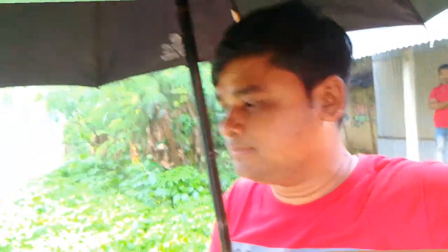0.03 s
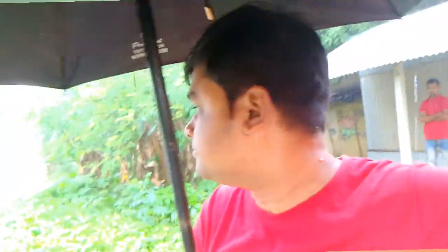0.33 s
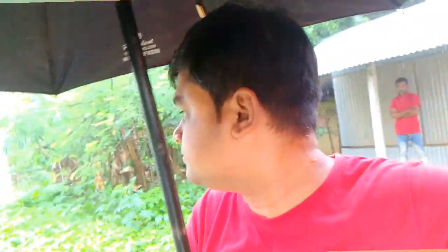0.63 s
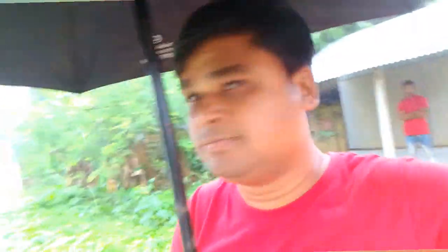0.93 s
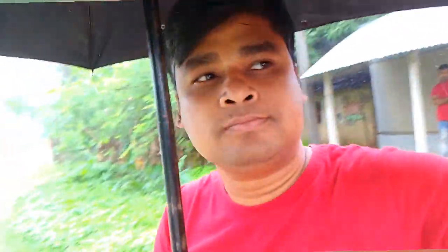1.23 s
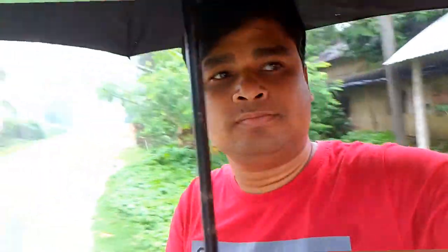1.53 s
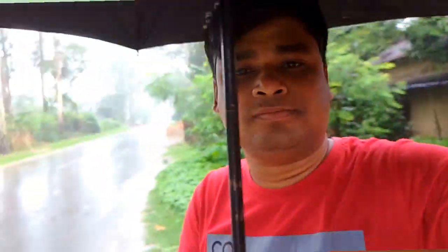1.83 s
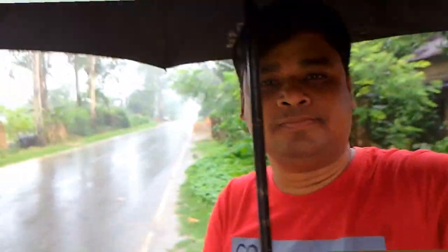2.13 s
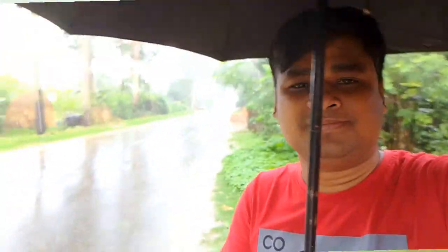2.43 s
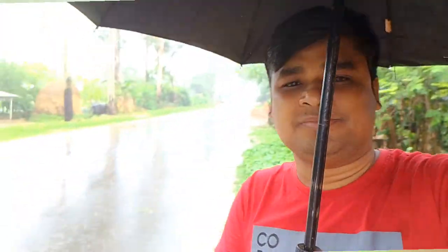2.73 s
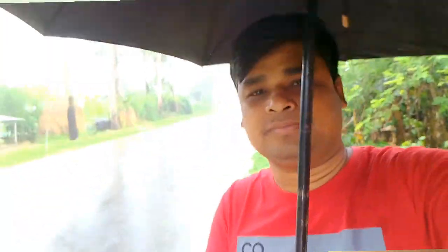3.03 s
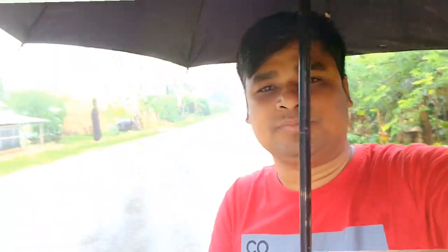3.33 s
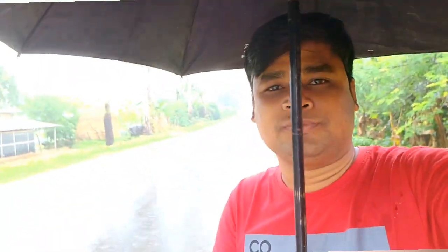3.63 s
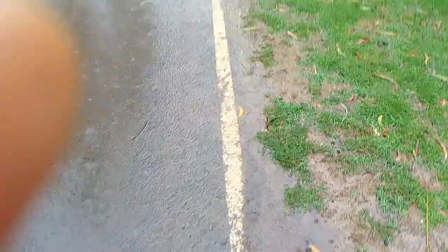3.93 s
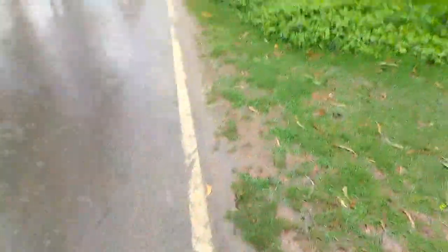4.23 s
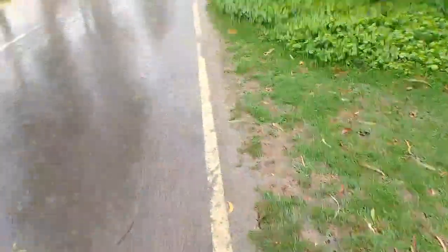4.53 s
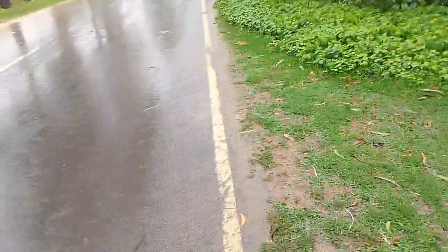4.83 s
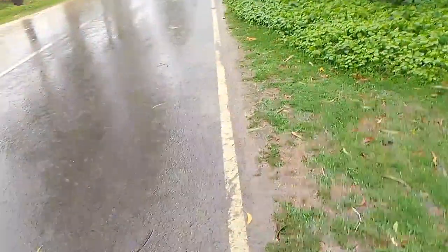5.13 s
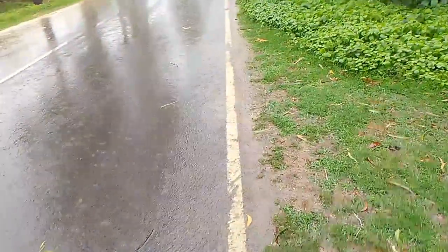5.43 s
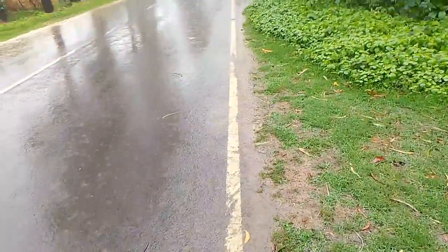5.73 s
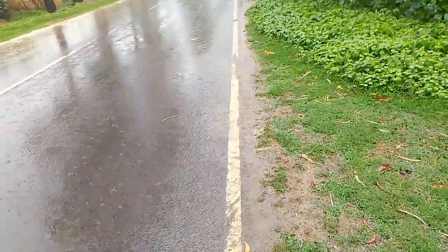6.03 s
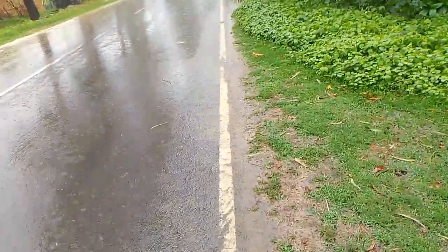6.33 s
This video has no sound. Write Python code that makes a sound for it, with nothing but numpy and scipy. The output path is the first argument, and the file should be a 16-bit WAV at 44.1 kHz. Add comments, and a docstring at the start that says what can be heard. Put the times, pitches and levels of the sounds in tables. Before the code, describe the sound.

Steady rain at a roadside is heard from under an umbrella. From the start, dense small drops tap the taut cloth just overhead, with fatter ones knocking above the rest. Farther off, rain washes over road and leaves and fizzes on the wet ground. During the first 2 seconds, air buffets the microphone with low rumbles and soft thumps, strongest around 1.7 seconds. Now and then a drop splashes nearby with a bright tick, notably around 2.5 and 3.2 seconds. At about 3.9 seconds the sound cuts to silence. It returns at 4.3 seconds, hollow and with a watery ring that fades over the next second. The rain fills out again, with heavier, more distinct taps on the cloth and a few more close splashes, continuing until about 6.6 seconds.

```python
"""Steady rain at a roadside, on one microphone under an umbrella.
Close overhead, drops tap the taut cloth; farther off, rain washes over road and leaves and fizzes
on the wet ground. At first air buffets the microphone, and now and then a drop splashes nearby.
Near 3.9 s the sound stops for about half a second. It returns hollow, with a watery ring,
and fills out again with heavier taps."""
import sys
import numpy as np
from scipy import signal
from scipy.fft import rfft, irfft
from scipy.io import wavfile
from scipy.ndimage import uniform_filter1d

SR = 44100
rng = np.random.default_rng(int(sys.argv[2]) if len(sys.argv) > 2 else 0)


def generate_wav(signal):
    """Clip the signal to [-1, 1] and save it as 16-bit WAV at the path in sys.argv[1]."""
    frames = np.transpose(np.atleast_2d(signal))
    scaled = np.clip(frames, -1, 1) * 32767
    pcm = np.round(scaled).astype(np.int16)
    wavfile.write(sys.argv[1], SR, pcm)


N = 289737
TIME = np.arange(N) / SR
PAUSE_START_S, PAUSE_END_S = 3.8697, 4.3273

# spectra of the far wash and of the spray on the ground: frequency_hz, relative_db
WASH_SPECTRUM = [(30, -10.5), (100, -4.5), (200, -7.5), (500, -2), (1000, 2.5), (1800, 2.5), (2500, -1),
                 (3500, -1.5), (4200, -16), (6500, -16), (15500, -46.5)]
SPRAY_SPECTRUM = [(1500, -19.5), (4000, -6.5), (5200, -6.5), (6500, -12), (8300, -8), (10300, -9),
                  (12000, -14.5), (15500, -16.5)]
# brief flurries and lulls in the rain: start_s, length_s, patter_rise_db, spray_rise_db
FLURRIES = [(1.216, 0.037, -5, -1), (2.4, 0.19, 0.5, 1), (3.143, 0.19, 0, 1), (3.486, 0.093, 2.5, 0),
            (3.638, 0.064, -7, -1), (4.312, .047, -7, 1), (4.414, 0.043, -10, -2), (4.768, .05, -0.5, 0.5),
            (5.31, 0.039, -5, 0), (5.451, 0.016, -9, -1), (5.624, 0.024, 1.5, -2), (5.733, 0.043, -6, -0.5),
            (5.89, .014, -4, -5), (5.915, .05, 1, -2), (6.272, 0.032, 1, 2), (6.328, 0.022, -11, 1),
            (6.425, 0.18, 1, 0)]
# gusts on the microphone: start_s, length_s, level_db
GUSTS = [(0.119, 0.21, -35), (0.373, 0.044, -38), (0.637, 0.22, -37), (0.878, .1, -40.5),
         (1.026, 0.065, -32.5), (1.11, 0.24, -38.5), (1.278, 0.38, -41), (1.628, 0.11, -30),
         (1.767, 0.11, -36.5), (1.942, 0.075, -34), (2.135, 0.24, -45), (2.697, .14, -50),
         (3.376, 0.054, -47)]
# low puffs of air on the microphone: centre_s, peak_db, pitch_hz
PUFFS = [(0.147, -30, 55), (0.216, -30, 70), (0.293, -26, 50), (0.396, -27, 130), (0.654, -32, 70),
         (0.688, -27.5, 70), (0.767, -27.5, 80), (0.832, -30, 50), (1.034, -27, 90), (1.071, -30, 130),
         (1.19, -31.5, 70), (1.337, -31.5, 90), (1.672, -23, 140), (1.731, -20.5, 100), (1.862, -29.5, 55),
         (1.901, -31, 55), (2.01, -26.5, 80), (3.405, -34.5, 55), (5.075, -34, 60)]
# sharp splashes close by: start_s, level_db
SPLASHES = [(0.3303, -19.5), (0.4500, -18), (0.5438, -20), (0.564, -20), (2.021, -18.5), (2.422, -20),
            (2.481, -15), (2.5912, -15), (3.1936, -14.5), (3.2775, -18), (3.3694, -20), (3.3946, -16.5),
            (3.762, -22), (5.1166, -14), (5.5535, -16.5), (6.074, -20), (6.5517, -16.5)]
# spectrum of a tap on the cloth, before and after the pause: frequency_hz, relative_db
CLOTH_BEFORE = [(40, -10), (150, -6.5), (300, -1), (450, 1), (750, 0), (1100, -1.5), (1450, -2), (1850, 1),
                (2400, -5), (3400, -6), (4200, -12), (6500, -13.5), (8400, -13.5), (12000, -25.5),
                (15500, -20.5)]
CLOTH_AFTER = [(40, -18.5), (150, -6), (220, -2.5), (550, -1), (720, -6), (1050, 1), (1750, 2), (2400, 0),
               (3400, -5), (4200, -9), (6500, -15), (8300, -17), (12000, -18), (15500, -24)]
# the fattest drops on the cloth: start_s, level_db (energy taken over 3 ms), pitch_hz, soft_above_hz
HEAVY_DROPS = [(0.014, -25, 1800, 3600), (0.1184, -23.5, 1940, 3600), (0.294, -23.5, 450, 1000),
               (0.3221, -24, 470, 1500), (0.368, -25, 1340, 3600), (0.5936, -25, 1100, 2400),
               (0.7091, -27, 775, 2400), (0.7771, -24.5, 775, 2400), (0.821, -25.5, 1530, 3600),
               (0.9889, -26, 645, 2400), (1.0752, -25, 1660, 3600), (1.1262, -26.5, 1010, 3000),
               (1.1898, -22.5, 1810, 2400), (1.2091, -24.5, 925, 2800), (1.3579, -24.5, 2150, 4500),
               (1.4228, -27, 1010, 4500), (1.5004, -27, 1400, 3000), (1.6232, -27, 750, 3000),
               (1.6342, -25.5, 1660, 3600), (1.7232, -25.5, 1055, 4000), (1.7762, -26.5, 990, 4000),
               (1.8256, -23.5, 1800, 2600), (2.0285, -27, 690, 2400), (2.0981, -26, 860, 2400),
               (2.1196, -26, 1055, 4500), (2.2333, -25.5, 1010, 3000), (2.625, -27, 430, 2400),
               (2.6326, -24, 950, 2200), (2.6555, -24.5, 730, 3600), (2.7667, -26.5, 880, 2600),
               (2.8311, -25, 1530, 3600), (2.8944, -25.5, 1765, 3000), (3.055, -25, 1790, 2600),
               (3.0989, -26.5, 1310, 3000), (3.5074, -25.5, 710, 4000), (3.5436, -26.5, 1960, 3600),
               (3.6142, -26.5, 625, 3000), (3.6322, -25.5, 1850, 2400), (3.6855, -22.8, 1830, 3400),
               (3.8142, -25.5, 1980, 3000), (4.4522, -22, 1800, 3600), (4.508, -25, 1700, 2400),
               (4.5727, -25.5, 1250, 3000), (4.6452, -25, 1660, 3000), (4.796, -25, 1750, 3600),
               (4.868, -25.5, 1400, 6000), (4.9536, -24.5, 1030, 2600), (4.9866, -25.5, 1640, 3000),
               (5.0669, -25.5, 1440, 5000), (5.1151, -23.5, 1080, 3000), (5.2449, -24.5, 1570, 5000),
               (5.2843, -23.5, 1830, 3000), (5.4432, -24, 1120, 2400), (5.4723, -20.5, 1700, 1500),
               (5.4908, -25.5, 1120, 2000), (5.5064, -24.5, 1380, 3000), (5.547, -26, 1600, 5000),
               (5.5716, -22.5, 1100, 5500), (5.6385, -25, 1950, 4000), (5.6915, -24, 1790, 3000),
               (5.7155, -22.5, 1440, 3600), (5.7235, -25, 1350, 2000), (5.8063, -27, 880, 5000),
               (5.8344, -25.5, 990, 4500), (5.8829, -25, 1160, 2600), (5.9063, -22, 1380, 3400),
               (6.0201, -24.5, 1610, 2600), (6.1305, -25, 1485, 4500), (6.2172, -26, 1480, 3600),
               (6.3184, -24, 1120, 3400), (6.5199, -23.5, 1420, 2200), (6.5293, -24, 925, 4500),
               (6.5579, -24, 1810, 4000)]
# bands hollowed out after the pause: start_hz, width_hz, depth_db, full_again_s, sink_hz_per_s
HOLLOWS = [(102, 116, 27, 5.0, -7), (437, 75, 19, 5.4, 1), (664, 137, 21, 5.7, 4),
           (818, 305, 23.5, 4.98, 130), (1566, 110, 19, 5.2, 0), (1867, 45, 22, 14, -3),
           (2490, 190, 25, 5.6, 0), (3040, 940, 17, 4.77, 0), (3220, 110, 22, 5, 0),
           (3985, 380, 18, 5.3, 0), (4550, 100, 16, 6.2, 0), (4770, 890, 5, 4.7, 0),
           (5170, 290, 20, 5.4, 330), (6250, 670, 4, 5.2, 0), (7450, 100, 16, 6, 0),
           (7960, 760, 14, 4.48, 0), (9720, 130, 17, 5.3, 0), (12300, 2800, 15, 4.7, 0),
           (13880, 400, 20, 5.1, -200)]
# watery tones that ring when the sound returns: tone_hz, rise_db
RING_TONES = [(236, 9), (350, 2), (555, 8), (960, 4), (1060, 9), (1215, 6), (1500, 7), (1760, 7), (2045, 3),
              (2290, 5), (2627, 19), (2860, 12), (3090, 7), (3480, 18), (3750, 19), (3962, 20), (4200, 17),
              (4465, 21), (4870, 11), (5410, 18), (5770, 11), (5870, 12), (6770, 7), (6950, 10), (7190, 10),
              (7610, 6), (8080, 6), (8310, 7), (8699, 11), (9010, 7), (9330, 5), (9950, 7), (10280, 10),
              (10470, 11), (11380, 8), (11900, 8), (13380, 6), (14380, 9)]


def from_db(db):
    """Decibels to gain."""
    return 10 ** (np.asarray(db) / 20)


def rms_one(x):
    """Scale to an rms of 1."""
    return x / np.sqrt(np.mean(x ** 2) + 1e-20)


def response(spectrum, size=2048):
    """The sharpest causal pulse that has this spectrum (minimum phase); peak 1."""
    hz, level_db = np.transpose(spectrum)
    grid_hz = np.maximum(np.fft.rfftfreq(size, 1 / SR), 1)
    gain = from_db(np.interp(np.log(grid_hz), np.log(hz), level_db))
    cepstrum = irfft(np.log(gain))
    cepstrum[1:size // 2] *= 2
    cepstrum[size // 2 + 1:] = 0
    pulse = irfft(np.exp(rfft(cepstrum)))
    return pulse / np.abs(pulse).max()


def through(x, pulse):
    """Every sample of x plays the pulse."""
    return signal.fftconvolve(x, pulse)[:N]


def tailed_click(t60_s, tail_db, size=4096):
    """A click followed by a dying scatter of reflections."""
    age = TIME[:size]
    tail = rng.standard_normal(size) * from_db(-60 * age / t60_s) * (1 - np.exp(-age / 0.00027))
    pulse = from_db(tail_db) * tail / np.linalg.norm(tail)
    pulse[0] = 1
    return pulse


def rainfall(per_s, spread_db, max_spreads):
    """Impacts at random moments: many small ones, few large."""
    sizes = from_db(spread_db * np.minimum(rng.exponential(1, N), max_spreads))
    return sizes * (rng.random(N) < per_s / SR)


def wavering(depth_db, per_s):
    """A gain that wanders slightly at random."""
    steps = rng.standard_normal(1000)
    return from_db(depth_db * np.interp(TIME * per_s, np.arange(len(steps)), steps))


def settling(decay_s):
    """1 until the sound returns, then dying away."""
    return np.exp(-np.maximum(TIME - PAUSE_END_S, 0) / decay_s)


def flurries(edge_s=0.022):
    """Rise in dB of the patter and of the spray as flurries and lulls pass."""
    rise_db = np.zeros((2, N))
    for start_s, length_s, patter_db, spray_db in FLURRIES:
        inside_s = np.minimum(TIME - start_s, start_s + length_s - TIME)
        rise_db += np.outer([patter_db, spray_db], np.clip(inside_s / edge_s + .5, 0, 1))
    return rise_db


def wash():
    """Countless far drops on road and leaves merge into a smooth rush."""
    return rms_one(through(rng.standard_normal(N), response(WASH_SPECTRUM)))


def spray(peak_hz, width_hz, peak_db):
    """Fine droplets fizz on the wet ground, each a tick and a wisp of hiss, with one bright resonance."""
    ticks = rainfall(per_s=2000, spread_db=4, max_spreads=3.5) * rng.choice([-1, 1], N)
    dying = from_db(-60 * TIME[:2048] / .014) ** 2
    wisp_power = np.abs(through(ticks ** 2, dying / dying.sum()))
    grains = rms_one(ticks + np.sqrt(wisp_power) * rng.standard_normal(N))
    fizz = through(grains + from_db(1) * rng.standard_normal(N), response(SPRAY_SPECTRUM))
    resonance = signal.lfilter(*signal.iirpeak(peak_hz, peak_hz / width_hz, fs=SR), fizz)
    return rms_one(fizz + from_db(peak_db) * resonance)


def airflow(breeze_db=-45, calming_db_per_s=3, attack_s=0.018, release_s=0.011):
    """Strength of the air: each gust rises, holds and dies away over a weakening breeze."""
    power = from_db(breeze_db - calming_db_per_s * TIME) ** 2
    for start_s, length_s, level_db in GUSTS:
        rise = np.clip((TIME - start_s) / attack_s + .5, 0, 1)
        fall = np.exp(-np.maximum(TIME - start_s - length_s, 0) / release_s)
        power += (from_db(level_db) * rise * fall) ** 2
    return np.sqrt(power)


def buffeting():
    """Air moving across the microphone makes a lumpy low rumble."""
    spectrum = [(10, -20.5), (30, 0.5), (50, 0.5), (78, -2), (120, -8),   # frequency_hz, relative_db
                (200, -15.5), (400, -28), (1500, -86)]
    rumble = through(rng.standard_normal(N), response(spectrum))
    running_rms = np.sqrt(uniform_filter1d(rumble ** 2, size=4000) + 1e-12)
    return airflow() * rumble / running_rms


def puffs():
    """A sudden eddy gives the microphone one soft thump of pressure; small eddies sound higher."""
    thumps = np.zeros(N)
    for centre_s, peak_db, pitch_hz in PUFFS:
        swing = np.minimum((np.pi * pitch_hz * (TIME - centre_s)) ** 2, 30)
        thumps += from_db(peak_db) * (2 * swing - 1) * np.exp(-swing)
    return thumps


def splashes(ping_hz=8400):
    """A drop near the microphone bursts into droplets, with a brief bright ping."""
    bright = response([(1000, -18), (5000, -10), (7000, -6), (8500, 0), (11000, -1), (15500, -2)])
    burst = signal.fftconvolve(tailed_click(t60_s=.007, tail_db=6), bright)
    age = TIME[:len(burst)]
    ping = np.sin(2 * np.pi * ping_hz * age) * from_db(-60 * age / 0.01)
    splash = burst / np.abs(burst).max() + from_db(-5) * ping
    clicks = np.zeros(N)
    for start_s, level_db in SPLASHES:
        clicks[round(start_s * SR)] = from_db(level_db)
    return through(clicks, splash)


def canopy(rain):
    """Faint reflections under the dome of the umbrella colour the rain."""
    return through(rain, tailed_click(t60_s=.07, tail_db=-18))


def struck_spot(knock, pitch_hz, ring_db=1.5):
    """The struck spot of cloth adds a few cycles of its own pitch to the knock."""
    ring = signal.lfilter(*signal.iirpeak(pitch_hz, Q=5, fs=SR), knock)
    return knock + from_db(ring_db) * ring


def patter(drops, cloth, t60_s, ripple_db, spots=28):
    """Each drop pushes the cloth overhead down in one pulse; each spot has its own pitch and ripples."""
    spot_hit = rng.integers(0, spots, N)
    ripples = np.zeros(N)
    for spot, pitch_hz in enumerate(np.geomspace(420, 2900, spots)):   # slack cloth is low, taut high
        pulse = struck_spot(tailed_click(t60_s, ripple_db), pitch_hz)
        ripples += through(drops * (spot_hit == spot), pulse)
    taps = through(ripples, response(cloth))
    return rms_one(signal.sosfilt(signal.butter(1, 30, "high", fs=SR, output="sos"), taps))


def heavy_drops(cloth, ripple_db):
    """The fattest drops knock above the rest and ripple the cloth; a soft landing has little treble."""
    push = response(cloth)
    knocks = np.zeros(N + SR)
    for start_s, level_db, pitch_hz, soft_above_hz in HEAVY_DROPS:
        landing = signal.lfilter(*signal.butter(1, soft_above_hz, fs=SR), push)
        knock = signal.fftconvolve(tailed_click(t60_s=.015, tail_db=ripple_db), landing)
        knock = struck_spot(knock, pitch_hz)
        knock *= np.sqrt(.003 * SR / np.sum(knock ** 2))   # the energy of 3 ms at an rms of 1
        start = round(start_s * SR)
        knocks[start:start + len(knock)] += from_db(level_db) * knock
    return knocks[:N]


def light_rain(easing_db_per_s=0.38):
    """Dense small taps just above the microphone ease slowly, over the wash and spray."""
    patter_rise_db, spray_rise_db = flurries()
    drops = rainfall(per_s=900, spread_db=3, max_spreads=3)
    taps = patter(drops, CLOTH_BEFORE, t60_s=0.024, ripple_db=-2.5)
    taps *= from_db(-30 + patter_rise_db - easing_db_per_s * TIME)
    fizz = from_db(-35.5 + spray_rise_db) * spray(peak_hz=8400, width_hz=1300, peak_db=7.5)
    fizz *= wavering(depth_db=0.4, per_s=8.2)
    return taps + heavy_drops(CLOTH_BEFORE, ripple_db=4) + from_db(-34) * wash() + fizz


def heavy_rain():
    """Fewer, fatter drops stand out of the wash; the patter swells and settles as the spray fades in."""
    patter_rise_db, spray_rise_db = flurries()
    drops = rainfall(per_s=800, spread_db=5.3, max_spreads=2.2)
    taps = patter(drops, CLOTH_AFTER, t60_s=0.02, ripple_db=-8)
    surge_db = 4 * settling(decay_s=0.37) - 7.5 * settling(decay_s=0.11)
    taps *= from_db(-30.5 + patter_rise_db + surge_db)
    fizz = spray(peak_hz=8190, width_hz=1250, peak_db=10.5)
    fizz *= from_db(-35.4 + spray_rise_db - 13.5 * settling(decay_s=0.18))
    far_rain = from_db(-33) * wash()
    knocks = heavy_drops(CLOTH_AFTER, ripple_db=-1.5)
    return taps + far_rain + knocks + fizz * wavering(depth_db=0.5, per_s=5)


def ringing(hz, age_s, min_width_hz=70, q=85, fade_s=.42):
    """Gain by frequency and time: narrow tones give a watery ring that dies away."""
    tones_db = -7.0 * ((hz > 2450) & (hz < 6600))   # thins the hiss between the tones
    for tone_hz, rise_db in RING_TONES:
        width_hz = max(min_width_hz, tone_hz / q)
        tones_db += rise_db * 0.5 ** ((2 * (hz - tone_hz) / width_hz) ** 2)
    return from_db(np.outer(tones_db, np.exp(-age_s / fade_s)))


def shimmer(hz, age_s, from_hz=4000, depth_db=19, fade_s=.5):
    """Gain by frequency and time: random ridges in the treble flatten out, leaving the loudness alone."""
    knots_hz = np.cumsum(np.linspace(40, 130, 200))
    ridges = np.interp(hz, knots_hz, rng.uniform(-1, 1, len(knots_hz)))
    treble = np.clip((hz - from_hz) / from_hz, 0, 1)
    gain = from_db(np.outer(ridges * treble, depth_db * np.exp(-age_s / fade_s)))
    return gain / np.sqrt(uniform_filter1d(gain ** 2, size=25, axis=0))


def hollowed(rain, size=2048):
    """The sound returns ringing, with bands missing; each gap narrows and fills, some drifting in pitch."""
    hz, frame_s, frames = signal.stft(rain, SR, nperseg=size)
    since_return_s = frame_s - PAUSE_END_S
    for start_hz, width_hz, depth_db, full_again_s, sink_hz_per_s in HOLLOWS:
        centre_hz = start_hz - sink_hz_per_s * since_return_s
        missing = np.clip((full_again_s - frame_s) / (full_again_s - PAUSE_END_S), 0, 1)
        half_width_hz = width_hz / 2 * np.sqrt((1 + 2 * missing) / 3)
        band = np.exp(-((hz[:, None] - centre_hz) / half_width_hz) ** 4)
        frames *= from_db(-depth_db * band * missing)
    age_s = np.maximum(since_return_s, 0)
    frames *= ringing(hz, age_s) * shimmer(hz, age_s)
    return signal.istft(frames, SR, nperseg=size)[1][:N]


def scene():
    """Two stretches of rain with silence between; the one microphone feeds both channels."""
    near = splashes() + puffs()
    stopping = np.exp(-np.clip((TIME - PAUSE_START_S) / .0008, 0, 30))
    before = (canopy(light_rain()) + near + buffeting()) * stopping
    after = hollowed(canopy(heavy_rain()) + near) * (TIME >= PAUSE_END_S)
    return np.tile(before + after, (2, 1))


def record(dry):
    """The top is cut steeply above 15.55 kHz."""
    return signal.sosfilt(signal.ellip(10, .1, 80, 15550, fs=SR, output="sos"), dry)


dry = scene()
out = record(dry)
generate_wav(out)
```